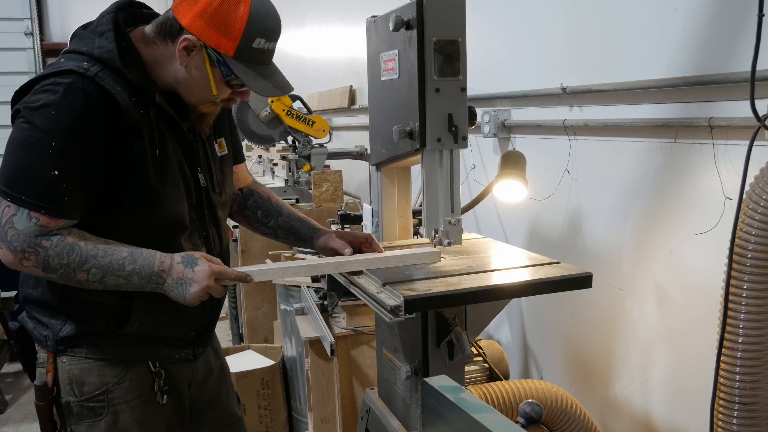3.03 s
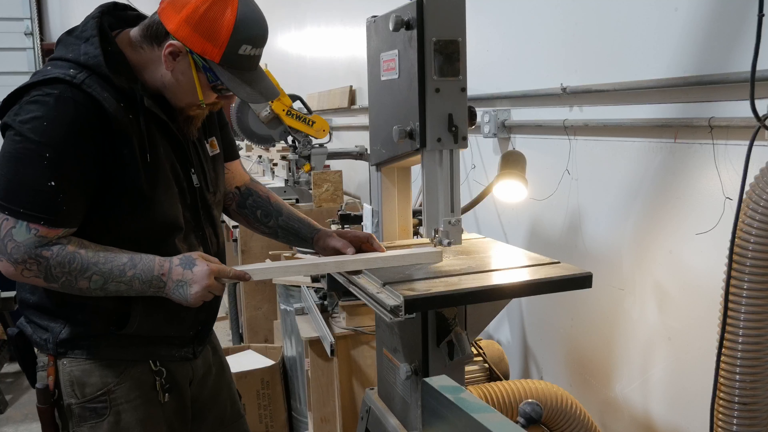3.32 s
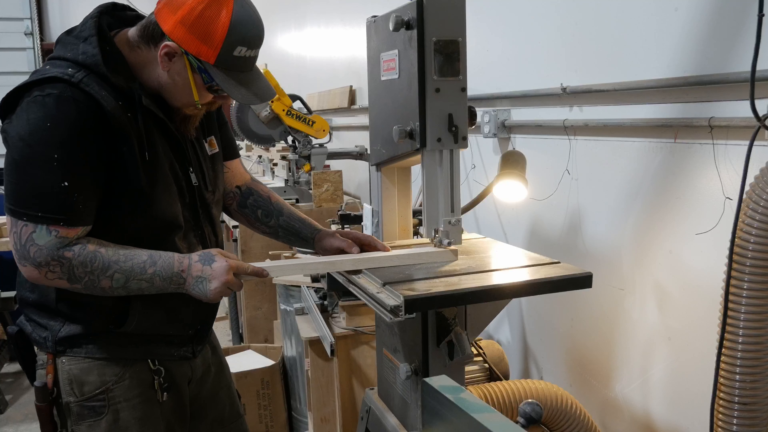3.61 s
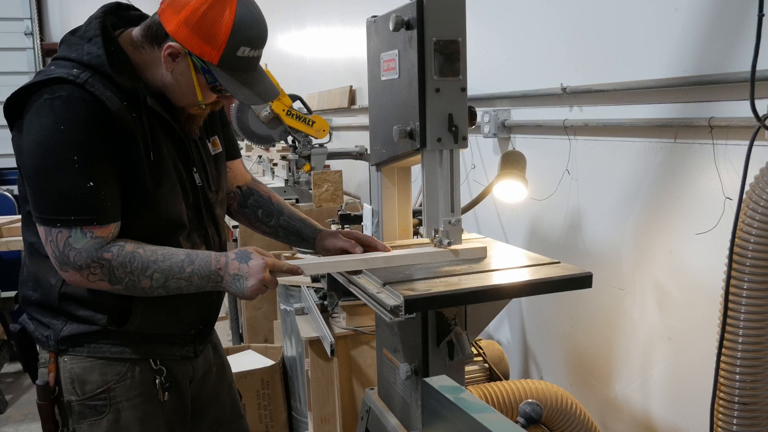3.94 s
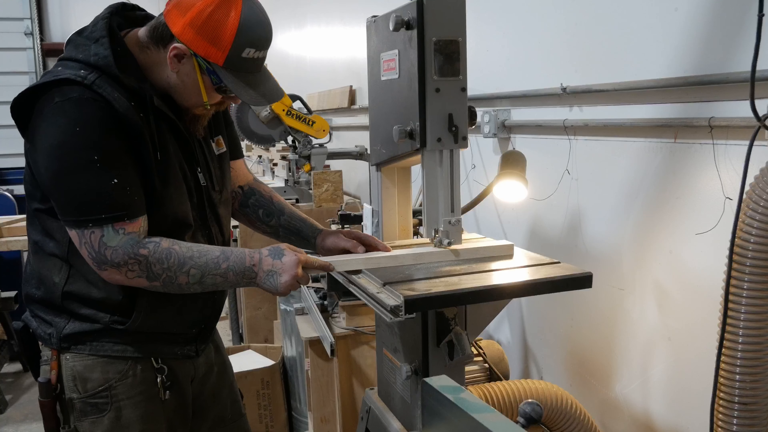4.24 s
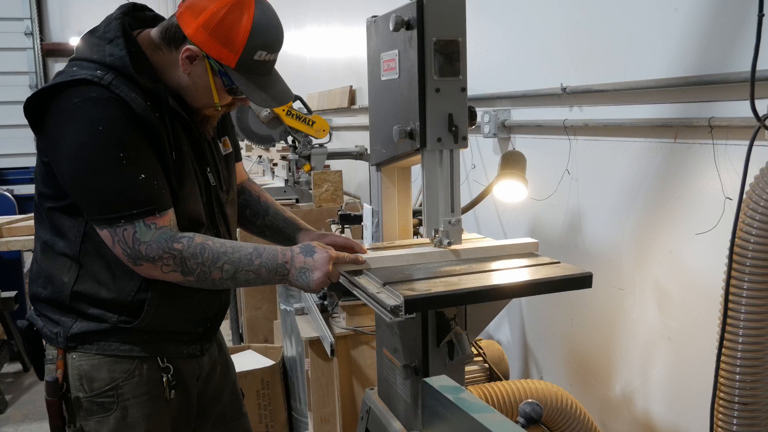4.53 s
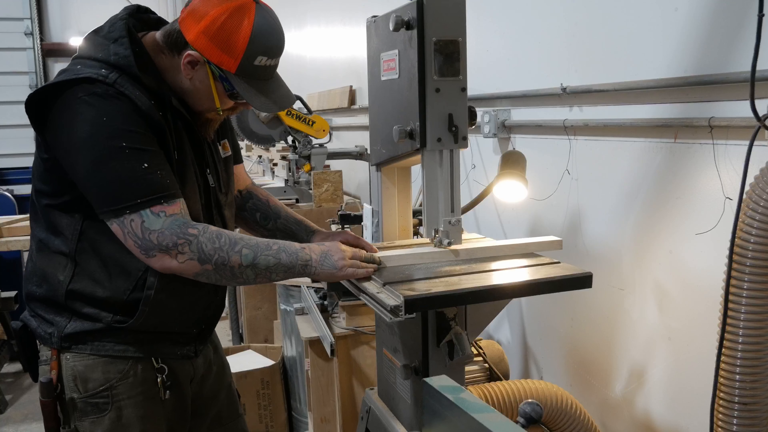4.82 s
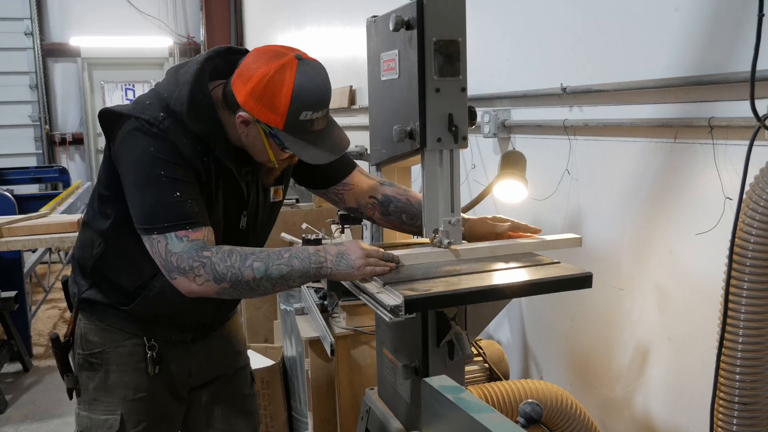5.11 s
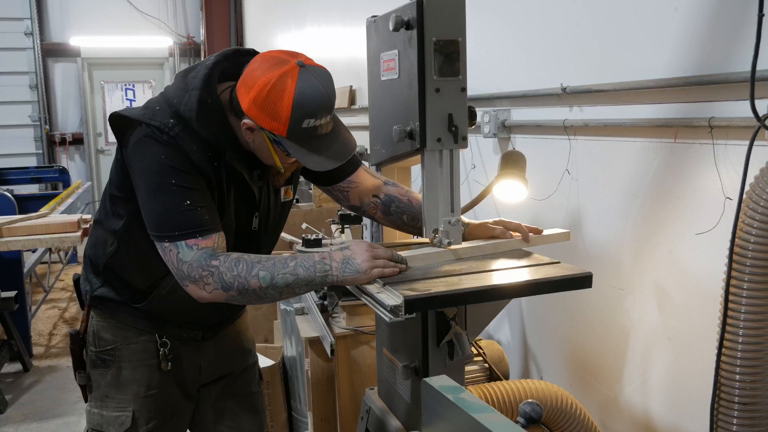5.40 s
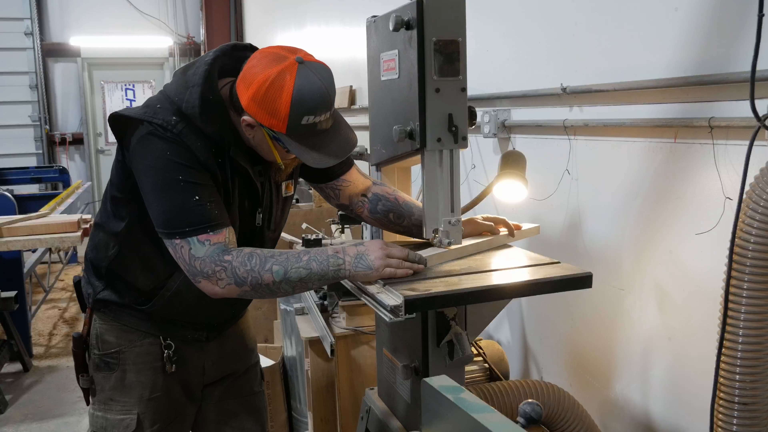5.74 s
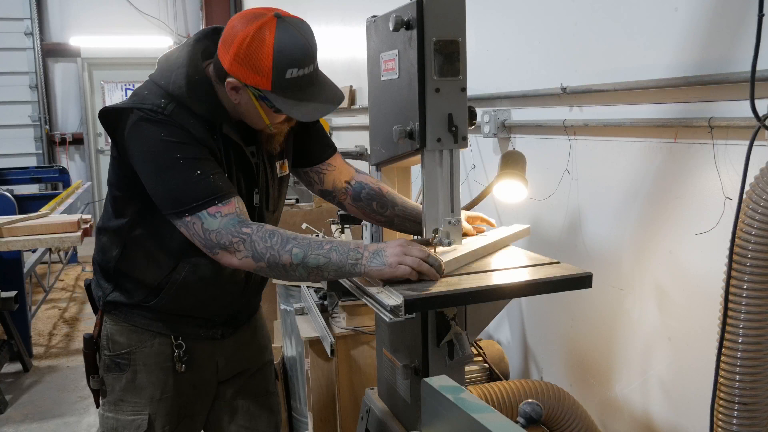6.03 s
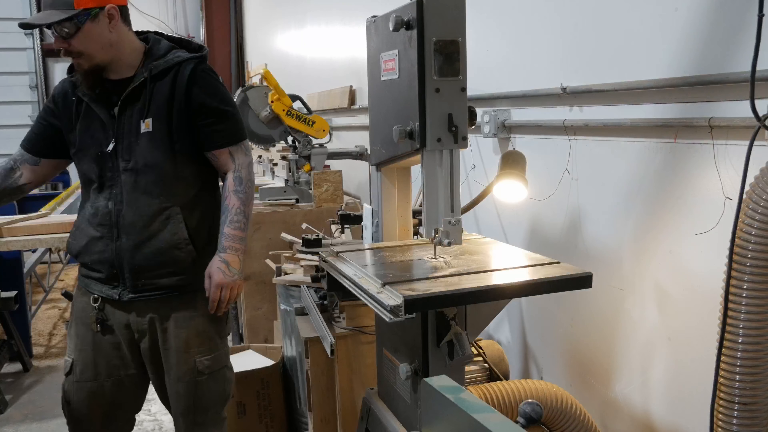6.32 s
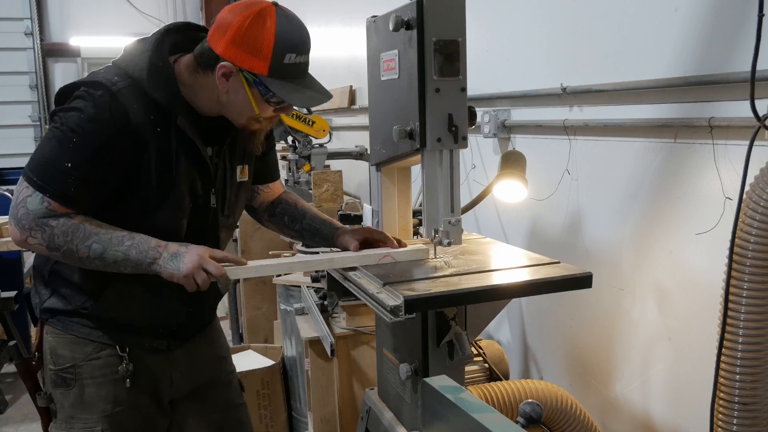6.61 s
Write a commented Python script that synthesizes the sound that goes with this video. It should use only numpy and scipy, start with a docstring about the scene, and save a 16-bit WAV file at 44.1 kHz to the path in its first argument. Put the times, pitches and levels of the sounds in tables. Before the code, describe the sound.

Close bandsaw cutting wood with a high, ringing squeal, easing to a light rub between cuts, its motor whining throughout.

```python
"""A bandsaw rasps and squeals through wood, close to the microphone in a dry-sounding workshop. The teeth tear
the fibres and set the steel band ringing; the kerf grips the band and makes it squeal. The blank goes through
in two passes, the second ending in short nibbles. Between them the blade rubs in the kerf and then the blank
slides over the table; chips snap and the blank knocks on the table. Behind it all the motor whines, the wheels
stir the air and the blade ticks through its guides."""
import sys
import numpy as np
from scipy import signal
from scipy.fft import rfft, irfft, next_fast_len
from scipy.io import wavfile
from scipy.ndimage import uniform_filter1d

SR = 44100
rng = np.random.default_rng(int(sys.argv[2]) if len(sys.argv) > 2 else 0)


def store_wav(level_fs):
    """Save 16-bit WAV to argv[1]."""
    pcm = np.round(np.clip(np.atleast_2d(level_fs), -1, 1) * 32767)
    wavfile.write(sys.argv[1], SR, pcm.T.astype(np.int16))


N = 302526
T = np.arange(N) / SR
TOP_HZ = 15800
MAIN_RING_HZ, SAG_HZ = 3505, 80  # note of the unloaded band, and its drop at full load

# the blank is in the saw (start [s], end [s])
PASSES = [(-.3, 1.0), (3.04, 6.01)]
# how hard the blank is pushed (time [s], load [0-1])
FEED_LOAD = [(0, .38), (.9, .4), (1.05, 0), (3.15, 0), (3.65, .72), (4.36, .82), (4.42, .15), (4.51, 1),
             (4.85, .9), (5.42, .35), (6.1, 0)]
# long bites (start [s], end [s])
LONG_CUTS = [(-.1, .992), (3.351, 4.395), (4.445, 5.425)]
# short bites (start [s], end [s], grip [dB])
NIBBLES = [(3.05, 3.084, -23), (3.168, 3.292, -13.5), (5.523, 5.562, -18.5), (5.585, 5.641, -15),
           (5.661, 5.711, -15.5), (5.721, 5.785, -21), (5.844, 5.875, -21), (5.901, 5.938, -19.5),
           (5.946, 5.987, -24.5), (6.818, 6.95, -27)]
BITES = LONG_CUTS + [row[:2] for row in NIBBLES]
# the blade rubs the kerf, then the blank slides over the table (start [s], end [s], rise [s], fall [s], scrape
# [dB], hiss [dB])
RUBS = [(0.963, 1.99, 0.021, 0.19, -30, -31.5), (2.3, 3.191, 0.28, 0.081, -39, -51)]
# spectrum of dust spraying from the teeth, shared by the guide ticks (frequency [Hz], level [dB])
DUST_SPECTRUM = [(4000, -3), (8000, 9), (10700, 6), (11800, 11), (12800, 1), (15800, 4)]


def teeth(rasp_db=-26, ring_db=-27.5, blow_share=0.27, waver_share=0.002653, sway_hz=34.53, entry_s=0.18):
    """The teeth tear the wood and set the band ringing; load makes both louder and sags the rate."""
    # spectrum of tearing fibres (frequency [Hz], level [dB])
    rasp_spectrum = [(200, -20.5), (400, -26.5), (1000, -18), (1600, -10.5), (3000, 0), (4150, -2),
                     (4600, -1), (5400, -8), (8000, -2.5), (12000, 1), (13200, -4.5), (15800, -5)]
    # partials of the ringing band (multiple of the tooth pattern, level [dB])
    partials = [(3, -20.5), (5, -13.5), (6, -10.5), (8, -7.5), (9, -7), (10, -9), (11, -6.5), (12, -3),
                (13, 7.5), (15, -2.5), (18, 4.5), (26, 6), (39, -1)]
    load, rate = glide(FEED_LOAD), tooth_rate()
    grazing = 1 - uniform_filter1d(gate(BITES, 0.0082), size=2000)
    repeats = np.cumsum(rate) / SR
    blows = np.diff(np.floor(repeats), prepend=0) * amp(2 * wander(220))
    fibres = (1 + np.exp(-2 * (repeats % 1))) * noise()
    rasp = colour(blow_share * unit(blows) + (1 - blow_share) * unit(fibres), rasp_spectrum)
    rasp *= amp(rasp_db + 3 * load - 3.5 * grazing + 2 * wander(31))
    ring = unit(sum(amp(db) * sing(k * rate, waver_share * k * rate.mean(), flicker_db=3, speed=3.54)
                    for k, db in partials))
    ring *= 1 + 0.41 * np.sin(2 * np.pi * sway_hz * T + wander(4.8))  # the band sways between its guides
    ring *= amp(ring_db + load - 8 * grazing)
    return sum(swell(start, end, entry_s, 0.0068) for start, end in PASSES) * (rasp + ring)


def tooth_rate():
    """Repeats of the tooth pattern per second, sagging under load; the main ring is its 13th multiple."""
    return (MAIN_RING_HZ - SAG_HZ * glide(FEED_LOAD)) / 13


def squeal(modes, squeal_db, spray_db, settle_s=0.051, release_s=0.025):
    """The kerf grips the band and dust sprays; the modes fall as the teeth bite, rise as they let go."""
    grip_db, centre_hz = grip()
    bend = np.ones(N)
    for start, end in BITES:
        biting = 0.03 * np.exp(-abs(T - start) / settle_s)
        leaving = 0.074 * np.clip(1 - (end - T) / release_s, 0, 1)
        bend += ((T > start) & (T < end)) * (biting + leaving)
    band = unit(sum(amp(db) * sing(hz * bend, waver_hz, flicker_db=4) for hz, waver_hz, db in modes))
    band = 0.78 * band + resonate(band, centre_hz, width_hz=1800)  # the grip favours some modes
    band /= np.sqrt(uniform_filter1d(band ** 2, size=1500) + 1e-9)  # even out the level
    spray = amp(spray_db + 0.76 * grip_db) * colour(noise(), DUST_SPECTRUM)
    chatter = amp(1.4 * wander(310))
    return gate(BITES, 0.0087) * (amp(squeal_db + grip_db) * band + spray) * chatter


def grip():
    """Squeal level and centre: they glide along a long cut and hold during a nibble."""
    # the kerf's hold on the blade in each pass (time [s], grip [dB], squeal centre [Hz])
    first_pass = [(0, -17, 8840), (0.5, -14.5, 8670), (0.8, -15.5, 9600), (0.87, -21, 9676),
                  (0.95, -16.5, 9700)]
    second_pass = [(3.35, -14, 10300), (3.6, -13, 8900), (3.74, -22, 10200), (4.02, -22, 9600),
                   (4.3, -22.5, 8570), (4.9, -22.5, 9800), (5.13, -16.5, 9900), (5.4, -19.5, 10300)]
    curve = first_pass + second_pass
    grip_db, centre_hz = glide(curve), glide(curve, column=2)
    for start, end, db in NIBBLES:
        inside = (T >= start) & (T <= end)
        grip_db[inside], centre_hz[inside] = db, 10300
    return grip_db, centre_hz


def howls(waver_share=0.00295, fade_share=0.17):
    """Single multiples of the tooth pattern swell and fade; their pitch sags with the blade's speed."""
    # howling partials (start [s], end [s], multiple of the tooth pattern, level [dB])
    notes = [(-.1, 0.984, 13, -32), (0.742, .99, 18, -30), (3.16, 3.47, 15, -34), (3.41, 4.047, 18, -31.5),
             (3.36, 5.4, 57, -31), (3.69, 4.242, 39, -27.5), (4.379, 4.466, 13, -17.5),
             (4.46, 4.65, 57, -28), (4.48, 5.01, 39, -22.5), (4.475, 5.05, 18, -29), (4.5, 5.04, 13, -28.5),
             (5.577, 5.896, 13, -28.5), (5.055, 5.274, 13, -28.5), (5.06, 5.187, 26, -26.5),
             (5.596, 5.886, 26, -26)]
    rate, out = tooth_rate(), np.zeros(N)
    for start, end, k, db in notes:
        fade_s, hz = fade_share * (end - start), k * rate
        out += amp(db) * swell(start, end, fade_s, fade_s) * sing(hz, waver_share * hz.mean(), 4)
    return out


def shrieks(fade_share=0.17):
    """Single notes ring out: the band locks onto one note of its own when the blank presses sideways on it, and
    the blank sings on a tone of its own as it slides over the table."""
    # notes of the band and of the sliding blank (start [s], end [s], pitch [Hz], waver [Hz], level [dB])
    notes = [(-.1, 0.97, 1657, 80, -41), (1.46, 2.144, 596, 4.4, -55), (2.216, 3.02, 2495, 12, -43.5),
             (3.024, 3.24, 2810, 70, -35.5), (3.88, 4.233, 11700, 340, -25.5),
             (4.018, 4.395, 6470, 230, -25), (4.493, 4.658, 6120, 200, -25),
             (4.241, 4.45, 2305, 12.3, -34.5), (4.284, 4.394, 8200, 270, -19.5),
             (4.444, 4.49, 9950, 60, -18), (5.472, 5.545, 8900, 40, -23)]
    out = np.zeros(N)
    for start, end, hz, waver_hz, db in notes:
        fade_s = fade_share * min(end - start, 0.4)
        out += amp(db) * swell(start, end, fade_s, fade_s) * sing(hz, waver_hz, flicker_db=3)
    return out


def knocks(crack_db=-8, wood_db=2, thump_db=1, crack_t60=0.044, wood_t60=0.065, thump_t60=0.041):
    """Each blow is a sharp crack, the dry clack of the blank's modes and a dull push on the table."""
    # knocks and snapping chips (time [s], crack [dB], wood [dB], thump [dB])
    blows = [(1.139, -35, -29, -75), (1.268, -13.5, -18.5, -75), (1.661, -35, -31, -75),
             (2.601, -11, -45, -52), (2.625, -5, -30.5, -54), (2.714, -18, -50, -65),
             (6.058, -11, -50, -54), (6.144, -10.5, -23, -73), (6.286, -6.5, -36, -40),
             (6.296, -10, -37, -13.5), (6.4071, 6, -18, -22), (6.556, -3, -26, -63),
             (6.572, -19, -20.5, -58)]
    # modes of the blank, short and broad because hands damp it (frequency [Hz], level [dB])
    wood_modes = [(1190, -2), (1620, -6), (1890, 9), (2400, 13.5), (3130, 15), (3700, 14.5), (5000, 7)]
    # spectra of a snapping chip and of the table's thump (frequency [Hz], level [dB])
    crack_spectrum = [(900, -13), (4500, 0.5), (6000, 1.5), (8500, 3), (15800, 1)]
    thump_spectrum = [(70, -14), (200, -9.5), (400, -18), (900, -14), (3000, -12.5)]
    t, out = np.arange(SR // 4) / SR, np.zeros(N)
    crack_fade = amp(-60 * t / crack_t60) + amp(-22 - 60 * t / 0.5)  # with a faint longer tail
    wood_fade = amp(-60 * t / wood_t60)
    for time, crack, wood, thump in blows:
        crack_noise, wood_noise, thump_noise = rng.standard_normal((3, len(t)))
        snap = colour(crack_noise, crack_spectrum) * crack_fade
        clack = sum(amp(db) * resonate(wood_noise * wood_fade, hz, width_hz=257) for hz, db in wood_modes)
        clack = unit(clack) * np.sqrt(np.mean(wood_fade ** 2))
        push = colour(thump_noise, thump_spectrum) * amp(-60 * t / thump_t60)
        blow = amp(crack + crack_db) * snap + amp(wood + wood_db) * clack + amp(thump + thump_db) * push
        add(out, time, blow * np.minimum(t / 0.0001, 1))
    return out


def rubbing(scrape_db=-6, hiss_db=-4, grain_db=1.5):
    """First the free-running blade brushes the walls of the kerf; then the blank slides over the table as it is
    turned."""
    # spectra of the scraping and its hiss (frequency [Hz], level [dB])
    scrape_spectrum = [(1100, -38), (1750, 2), (2500, 10.5), (3550, -1), (3800, -56), (4700, 15),
                       (5700, 2.5), (12000, -2)]
    hiss_spectrum = [(1700, 5), (4700, -2), (9000, 15), (11000, -11), (12750, 12), (15800, 6)]
    scrape = amp(scrape_db) * colour(noise(), scrape_spectrum)
    hiss = amp(hiss_db) * colour(noise(), hiss_spectrum)
    strokes = sum(swell(start, end, rise, fall) * (amp(scrape_level) * scrape + amp(hiss_level) * hiss)
                  for start, end, rise, fall, scrape_level, hiss_level in RUBS)
    return strokes * amp(grain_db * wander(100))


def throbs(rate_hz=25, depth=0.31):
    """Between cuts the main ring pulses as the band sways against the kerf."""
    # light touches on the band (start [s], end [s], level [dB])
    touches = [(0.984, 1.94, -42), (2.37, 3.186, -45)]
    pulse = 1 + depth * np.sin(2 * np.pi * rate_hz * T + wander(4.2))
    level = sum(amp(db) * gate([(start, end)], 0.017) for start, end, db in touches)
    return level * unit(pulse * sing(MAIN_RING_HZ, waver_hz=9, flicker_db=3))


def motor(hum_db=1.37, whine_db=3.5, waver_db=3, drift_share=0.000387, sag_share=0.012):
    """Tones on one drifting speed; the hum is nearly steady, the whine wavers and sags under load."""
    # motor and bearing tones (frequency [Hz], level [dB])
    tones = [(491.5, -53), (721.4, -59), (4319, -49), (4480, -44), (4657, -42), (5039, -50), (5200, -48),
             (5378, -41), (6098, -47.5), (6815, -48), (8258, -49), (8430, -49), (9146, -48)]
    clock = T + np.cumsum(drift_share * wander(3.75)) / SR
    loaded_clock = clock - sag_share * np.cumsum(glide(FEED_LOAD)) / SR
    knots, out = np.linspace(0, T[-1], 160), np.zeros(N)
    for hz, db in tones:
        waver = waver_db * np.interp(T, knots, rng.standard_normal(len(knots)))
        treble = min(hz / 3000, 1)
        level = amp(db + (2 - treble) * hum_db + treble * (whine_db + waver))
        cycles = hz * (loaded_clock if treble == 1 else clock) + rng.random()
        out += level * np.sin(2 * np.pi * cycles)
    return out


def wheels(rush_db=-35, housing_db=-36.5):
    """Air rushes round the running wheels and their housing hums."""
    # spectrum of the rushing air (frequency [Hz], level [dB])
    rush_spectrum = [(70, -21.5), (200, -14.5), (330, -2.5), (450, -8), (900, -9.5), (1800, -5.5),
                     (2600, -6), (3400, -3), (3800, -2), (5700, -2.5), (9200, -1), (15800, -10)]
    # resonances of the housing (frequency [Hz], width [Hz], level [dB])
    housing_modes = [(390, 54, -1.5), (2557, 30, 4.5), (3070, 460, 14.5), (4600, 450, 12), (7120, 140, 15)]
    rush = amp(rush_db + 1.17 * wander(40)) * colour(noise(), rush_spectrum)
    shake = noise()
    housing = unit(sum(amp(db) * unit(resonate(shake, hz, width)) for hz, width, db in housing_modes))
    return rush + amp(housing_db) * housing


def guide_ticks(tick_db=-34.5, rub_boost_db=5, rate_hz=19.56, decay_turns=0.18):
    """The blade brushes its guide once a turn, louder while the blank slides over the table."""
    turn = ((T - 2.063) * rate_hz) % 1
    level = amp(tick_db + 1.5 * wander(6.6) + rub_boost_db * swell(*RUBS[1][:4]))
    return level * np.exp(-turn / decay_turns) * colour(noise(), DUST_SPECTRUM)


def table_drone(idle_db=-60, cutting_db=-56):
    """The saw table drones on one faint note, stronger with the blade in the wood."""
    # brief surges of the drone (start [s], end [s], level [dB])
    surges = [(1.863, 2.144, -50), (2.312, 2.788, -52), (5.785, 5.868, -37)]
    level = amp(idle_db) + amp(cutting_db) * gate(PASSES, 0.028)
    level += sum(amp(db) * gate([(start, end)], 0.049) for start, end, db in surges)
    return level * sing(816.5, waver_hz=17.4, flicker_db=3.5)


def workshop(x, t60=0.087):
    """The room's short diffuse tail, different left and right and strongest in the bass."""
    # spectrum of the tail (frequency [Hz], level [dB])
    spectrum = [(30, 26), (130, 24), (400, 19), (1000, 14), (2200, -8), (15800, -47)]
    t = np.arange(SR // 3) / SR
    tail = np.array([colour(rng.standard_normal(len(t)), spectrum) for _ in range(2)])
    tail *= amp(-60 * t / t60) * (t > 0.004)
    return signal.fftconvolve(x[None], tail / np.linalg.norm(tail[0]), axes=1)[:, :N]


def sing(hz, waver_hz, flicker_db, speed=1.996):
    """A self-excited note, unsteady in pitch and strength."""
    rate_hz = speed * waver_hz + 15
    level = amp(flicker_db * wander(rate_hz))
    pitch = hz + waver_hz * wander(rate_hz)
    return unit(level * np.sin(2 * np.pi * np.cumsum(pitch) / SR))


def resonate(x, hz, width_hz):
    """A steep resonance at hz, which may be a curve."""
    carrier = np.exp(2j * np.pi * np.cumsum(hz * np.ones(len(x))) / SR)
    pole = np.exp(-np.pi * width_hz * np.sqrt(2) / SR)
    return 2 * (carrier * signal.lfilter([(1 - pole) ** 2], [1, -2 * pole, pole ** 2], x / carrier)).real


def colour(x, spectrum):
    """Filters by a spectrum drawn on a log-frequency axis, then scales to rms 1."""
    hz, db = np.transpose(spectrum)
    size = next_fast_len(len(x))
    f = np.fft.rfftfreq(size, 1 / SR) + 1
    gain = amp(np.interp(np.log(f), np.log(hz), db)) * np.minimum(f / hz[0], 1) * (f < TOP_HZ)
    return unit(irfft(rfft(x, size) * gain, size)[:len(x)])


def wander(rate_hz, step=16):
    """A smooth random curve of rms 1."""
    size = next_fast_len(N // step + 2)
    lowpass = np.exp(-(np.fft.rfftfreq(size, step / SR) / rate_hz) ** 2)
    slow = irfft(rfft(rng.standard_normal(size)) * lowpass, size)
    return unit(np.interp(np.arange(N) / step, np.arange(size), slow))


def glide(rows, column=1):
    """One column of a timed table, joined by straight lines."""
    rows = np.array(rows)
    return np.interp(T, rows[:, 0], rows[:, column])


def swell(start, end, rise_s, fall_s):
    """Attack, hold and release between two times."""
    return np.clip(np.minimum((T - start) / rise_s, (end - T) / fall_s), 0, 1)


def gate(spans, edge_s):
    """1 inside the spans, 0 outside, with ramps just inside each end."""
    return np.max([swell(start, end, edge_s, edge_s) for start, end in spans], axis=0)


def amp(db):
    return 10 ** (np.asarray(db) / 20)


def unit(x):
    return x / np.sqrt(np.mean(x ** 2) + 1e-20)


def noise():
    return rng.standard_normal(N)


def add(mix, start_s, sound):
    part = mix[round(start_s * SR):][:len(sound)]
    part += sound[:len(part)]


def scene():
    """The saw close up and centred, with a trace of the room around it."""
    # squealing modes of the band in each pass (frequency [Hz], waver [Hz], level [dB])
    first_modes = [(8340, 120, 1), (8780, 50, -8), (9220, 50, -11), (9655, 30, 0), (9900, 70, -1),
                   (11200, 60, -10)]
    second_modes = [(8290, 70, 0), (8800, 70, -4), (9200, 90, -6), (9520, 50, -2), (9870, 40, 1),
                    (11600, 130, -6)]
    first = squeal(first_modes, squeal_db=0.5, spray_db=-8.5)
    second = squeal(second_modes, squeal_db=-1, spray_db=-11)
    cut = teeth() + np.where(T < PASSES[1][0], first, second) + howls() + shrieks() + throbs()
    machine = motor() + wheels() + guide_ticks() + table_drone()
    direct = cut + machine + rubbing() + knocks()
    return direct + amp(-33) * workshop(direct)


def record(dry):
    """At the microphone the loudest peaks clip; the treble then stops at TOP_HZ."""
    lowpass = signal.firwin(1023, TOP_HZ, window=("kaiser", 9), fs=SR)
    return signal.oaconvolve(np.clip(dry, -1, 1), lowpass[None], "same")


dry = scene()
out = record(dry)
store_wav(out)
```